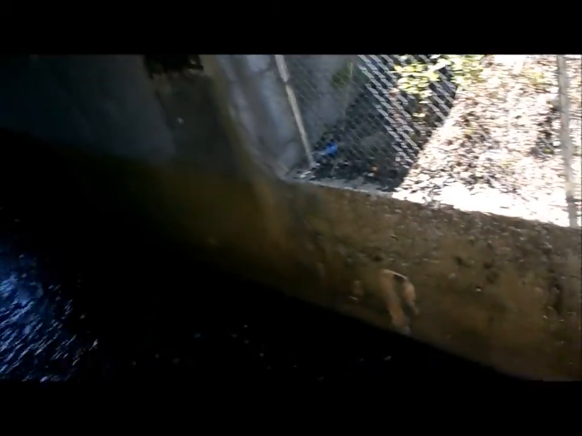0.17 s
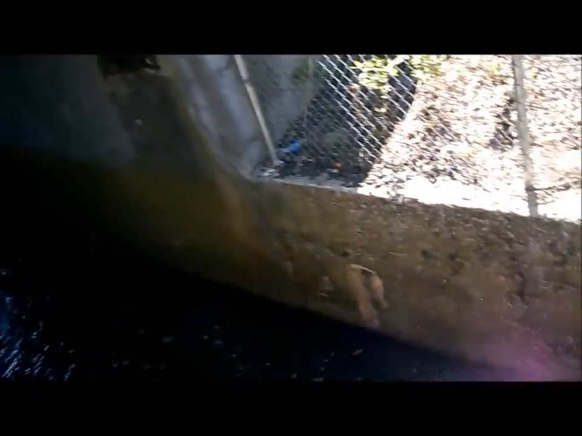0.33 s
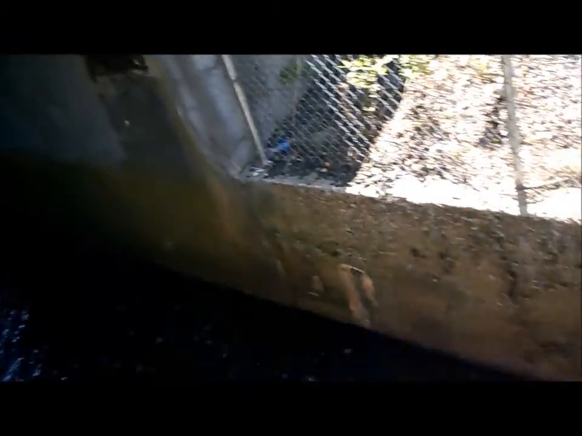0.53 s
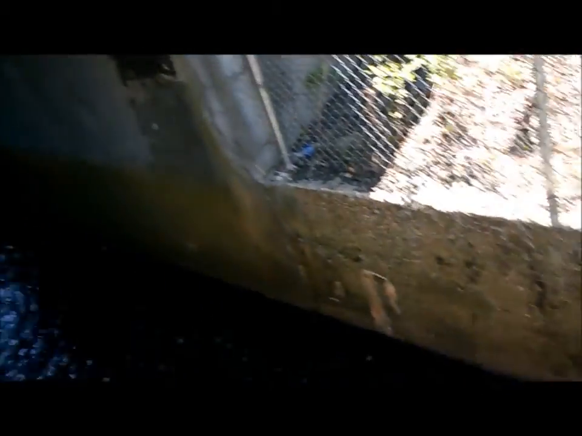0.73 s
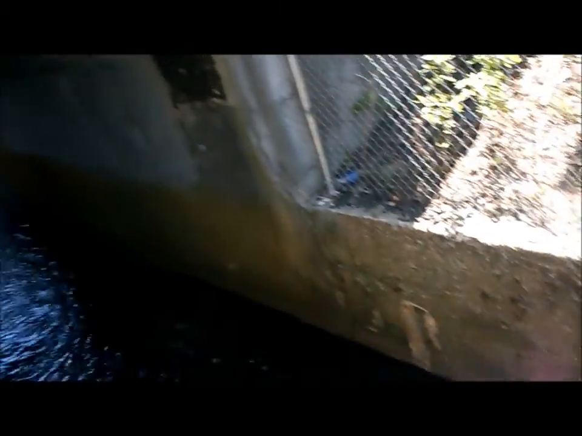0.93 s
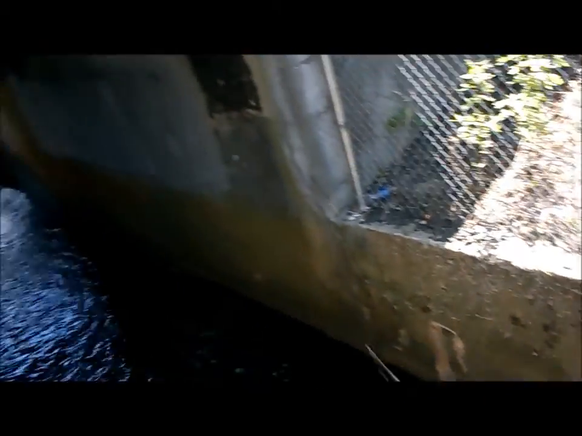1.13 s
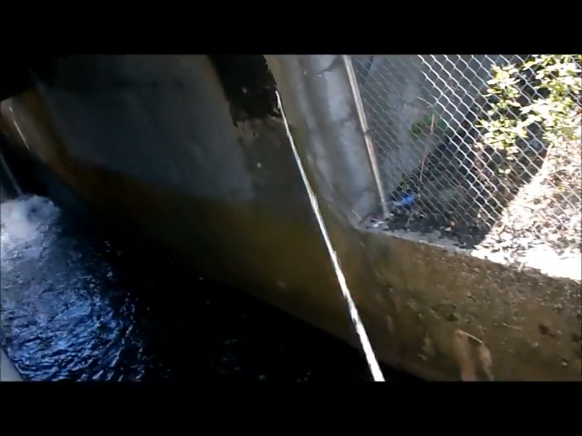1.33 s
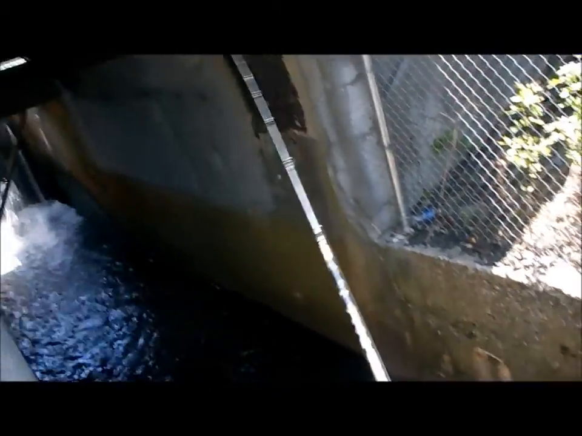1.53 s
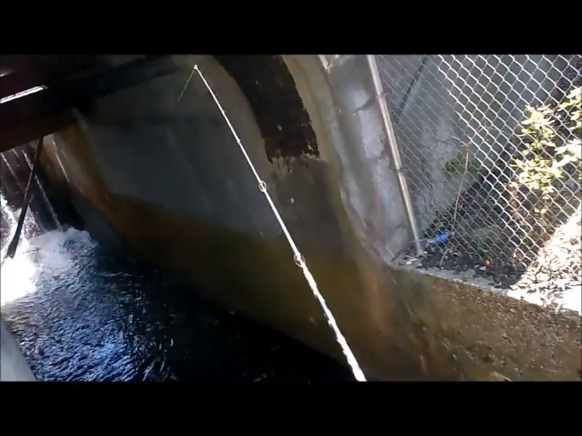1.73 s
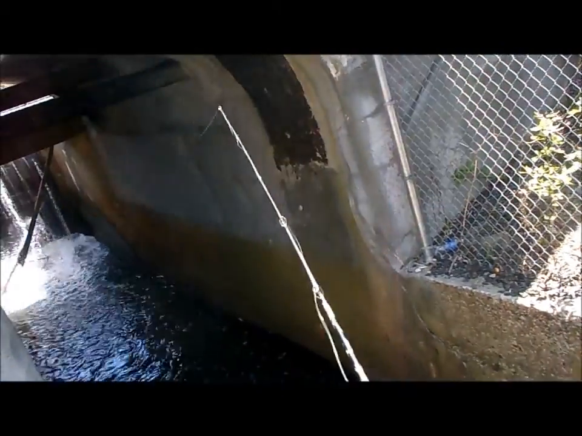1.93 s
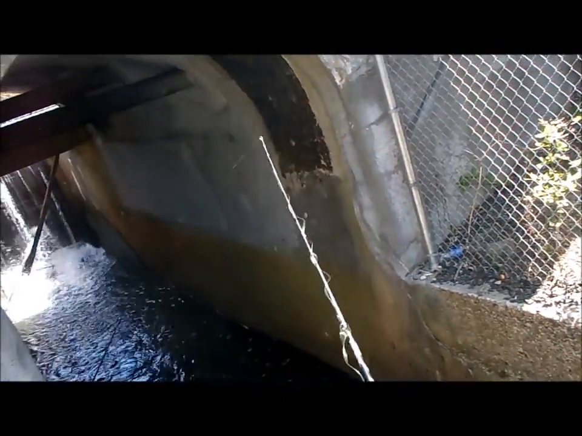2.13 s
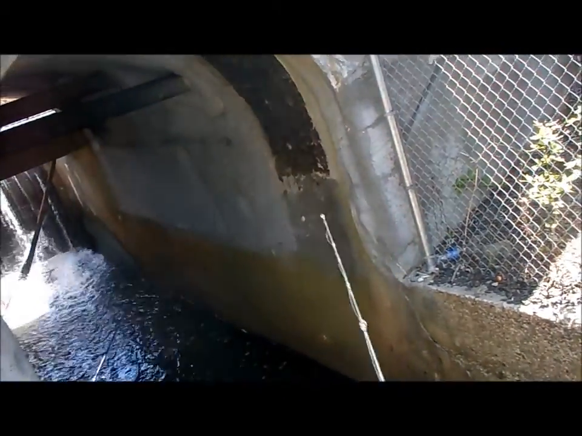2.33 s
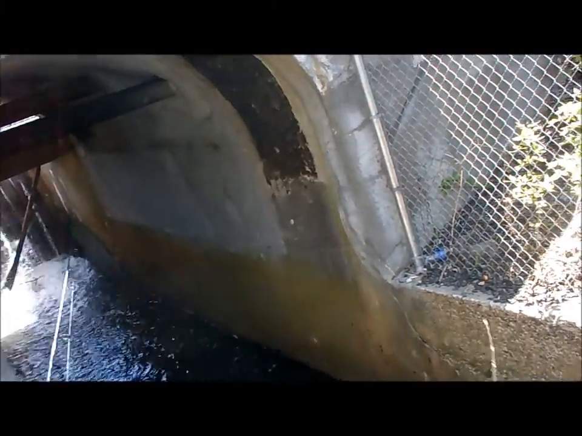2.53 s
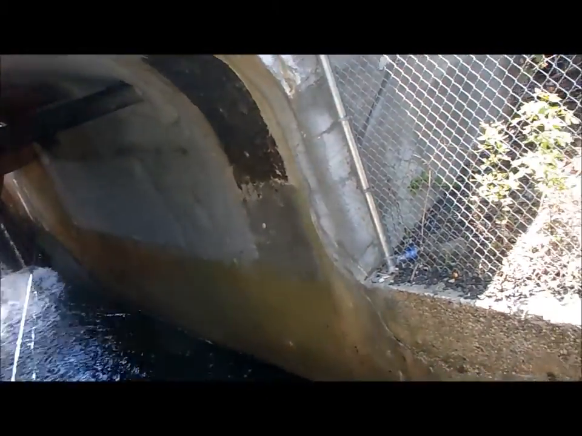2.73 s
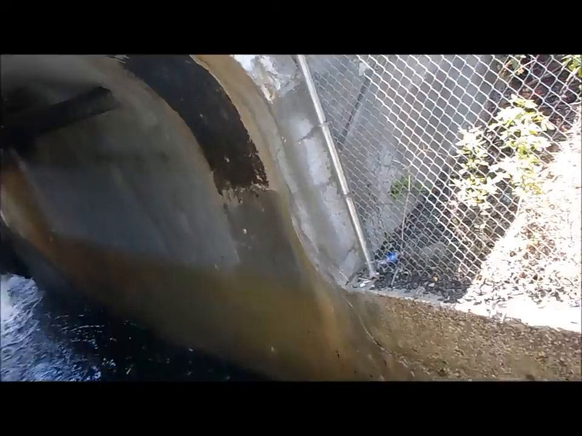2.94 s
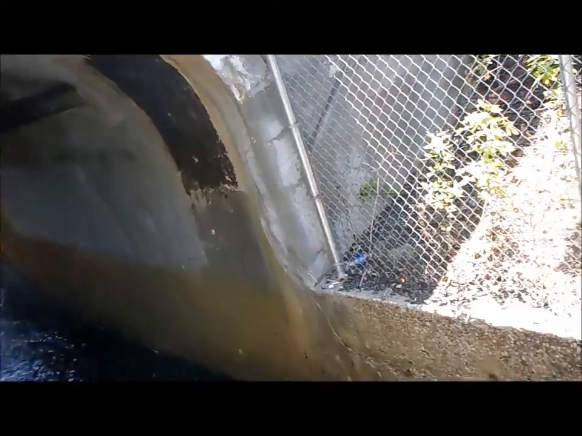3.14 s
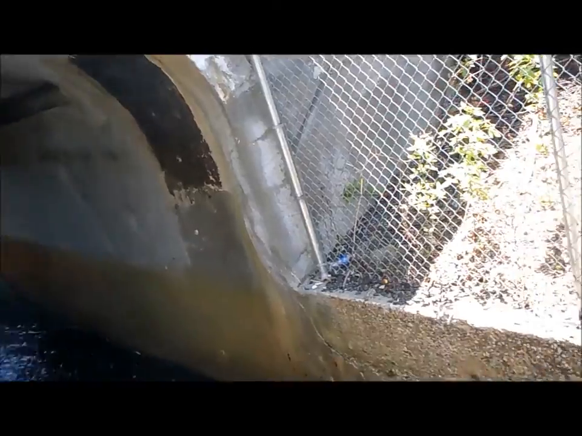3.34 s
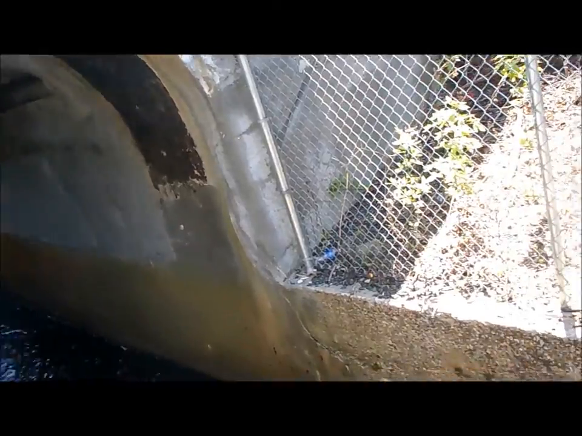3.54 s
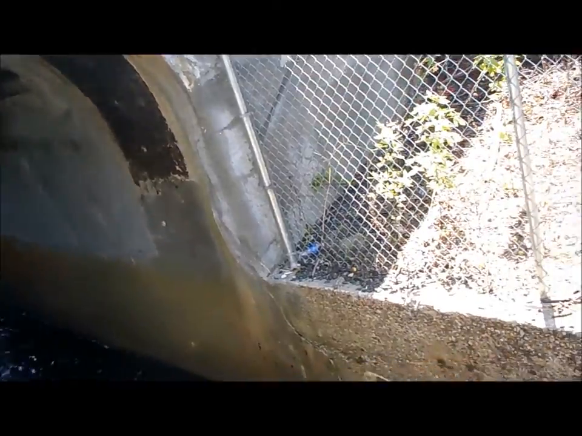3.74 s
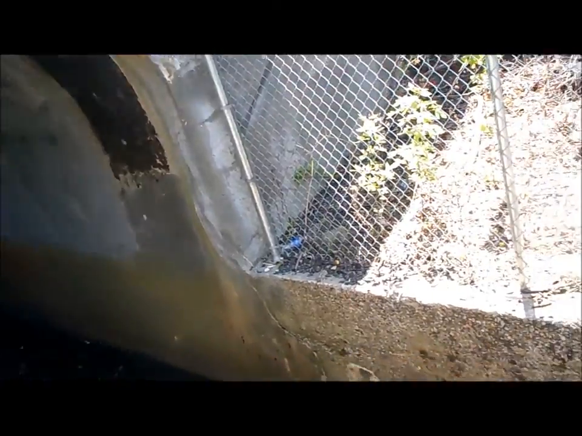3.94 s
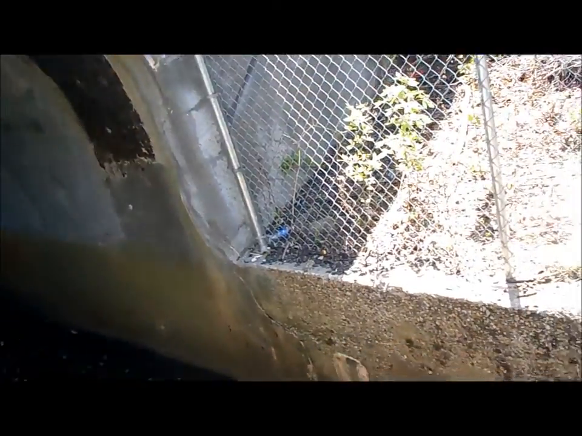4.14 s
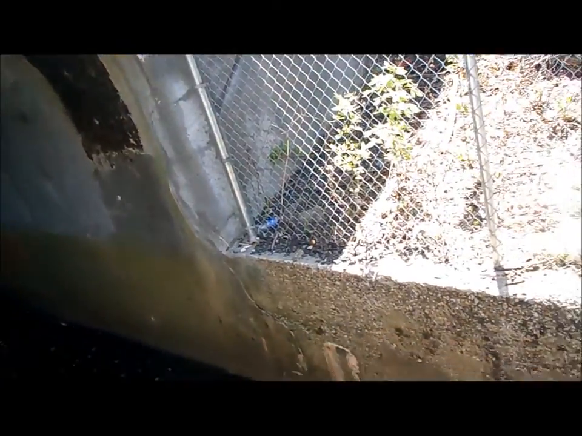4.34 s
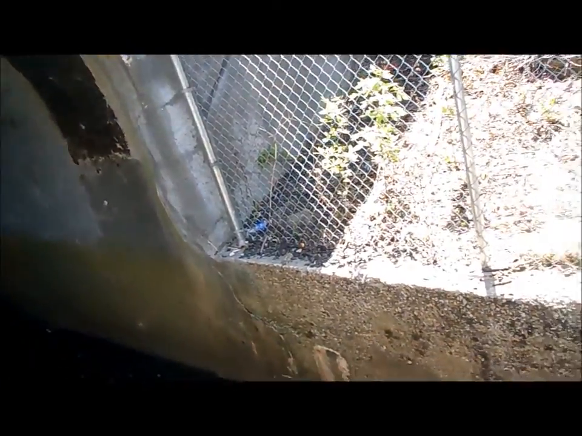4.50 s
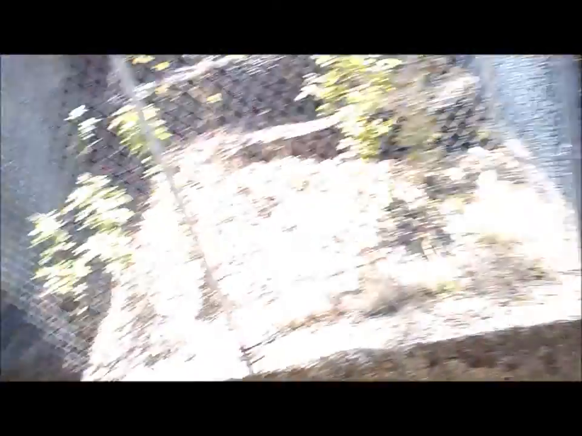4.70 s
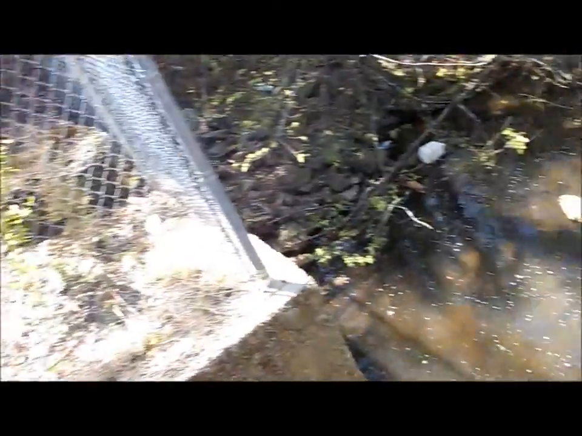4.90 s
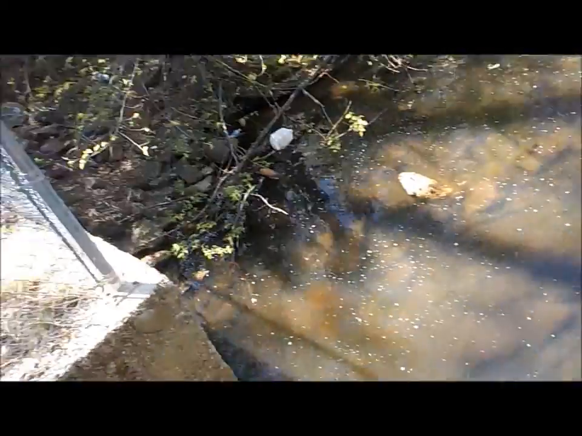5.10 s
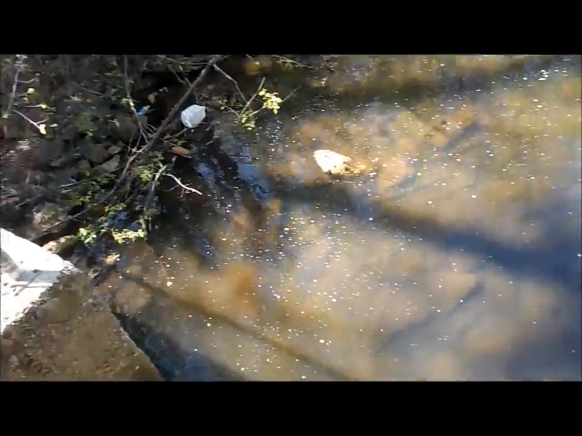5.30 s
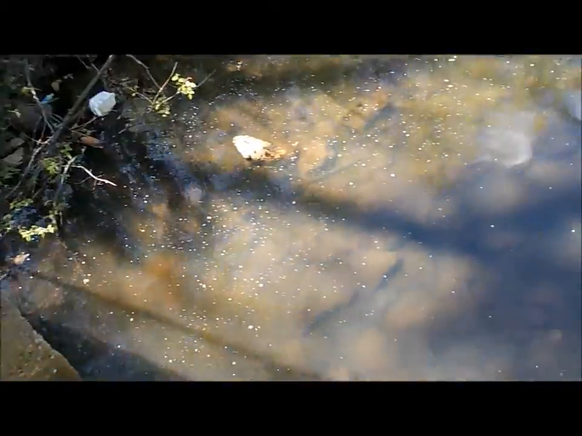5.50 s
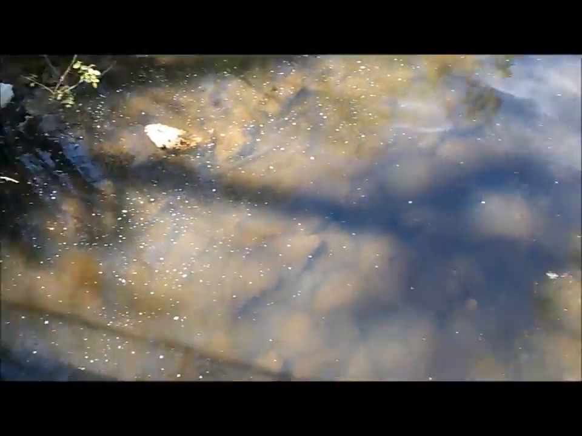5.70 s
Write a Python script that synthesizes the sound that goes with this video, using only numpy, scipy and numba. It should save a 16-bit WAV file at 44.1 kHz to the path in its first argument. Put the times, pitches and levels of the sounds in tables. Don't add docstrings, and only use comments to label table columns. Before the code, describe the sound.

A constant thin, boxy roar of falling water in a tunnel, two tiny scratchy ticks, and a softer, darker rush at the end.

```python
import sys
import numpy as np
from scipy import signal
from scipy.fft import rfft, irfft
from scipy.io import wavfile
from scipy.ndimage import uniform_filter1d
from numba import njit

SR = 44100
rng = np.random.default_rng(int(sys.argv[2]) if len(sys.argv) > 2 else 0)


def magnitude_from_level(level_db):
    exponent = np.asarray(level_db, float) / 20
    return 10 ** exponent


def store_wav(level_fs):
    pcm = np.round(np.clip(np.atleast_2d(level_fs), -1, 1) * 32767)
    wavfile.write(sys.argv[1], SR, pcm.T.astype(np.int16))


N = 254016


def unit(x):
    return x / np.sqrt(np.mean(x ** 2))


def colour(x, *spectra):
    log_hz = np.log(np.arange(N // 2 + 1) * SR / N + 1)
    gain_db = 0
    for spectrum in spectra:
        hz, db = np.transpose(spectrum)
        gain_db = gain_db + np.interp(log_hz, np.log(hz), db)
    return irfft(rfft(x) * magnitude_from_level(gain_db), N)


def walk(rate_hz):
    hold = int(SR / rate_hz)
    levels = np.repeat(rng.standard_normal(N // hold + 1), hold)
    smooth = uniform_filter1d(uniform_filter1d(levels, hold), hold)
    return unit(smooth[:N])


def band_noise(size, lo_hz, hi_hz):
    hz = np.arange(size // 2 + 1) * SR / size
    inside = (hz > lo_hz) & (hz < hi_hz)
    return unit(irfft(rfft(rng.standard_normal(size)) * inside, size))


def tackle():
    # start_s, level_db, length_s, centre_hz, width_hz
    swishes = [
        (2.033, -22, 0.0095, 7800, 5400),
        (2.038, -29, .026, 9600, 1800),
        (3.257, -24, .008, 8300, 3000),
    ]
    out = np.zeros(N)
    for start_s, level_db, length_s, centre_hz, width_hz in swishes:
        size = int(length_s * SR)
        burst = np.hanning(size) * band_noise(size, centre_hz - width_hz / 2, centre_hz + width_hz / 2)
        out[int(start_s * SR):][:size] += magnitude_from_level(level_db) * burst
    return out


def shading(x, surge_db, flicker_db):
    # time_s, turn (0-1)
    head_turn = [
        (0, 0),
        (1.5, 0),
        (3.5, 0.11),
        (4.3, 0.06),
        (4.7, 0.07),
        (4.95, 0.66),
        (5.3, 0.96),
        (5.76, 0.98),
    ]
    # frequency_hz, gain_db
    head_shadow = [(500, 0.5), (1300, 1.5), (1800, -5.5), (2400, -6.5), (3600, -5.5), (5000, -8),
                   (6500, -8.5), (10000, -4.5)]
    turn = np.interp(np.arange(N) / SR, *np.transpose(head_turn))
    shadow_hz, shadow_db = np.transpose(head_shadow)
    octave = np.log2(np.arange(N // 2 + 1) * SR / N + 1)
    centres = np.arange(8.4, 13.8, 0.25)
    spectrum, surge, out = rfft(x), walk(24.05), 0
    for centre in centres:
        share = np.interp(octave, centres, centres == centre)
        level_db = turn * np.interp(centre, np.log2(shadow_hz), shadow_db)
        level_db = level_db + surge_db * surge + flicker_db * walk(14)
        out = out + magnitude_from_level(level_db) * irfft(spectrum * share, N)
    return out


def tunnel(x, t60_s, wash_db):
    block = 1024
    moments = np.pad(x, (0, -N % block)).reshape(-1, block)
    t = np.arange(24 * block) / SR
    decay = np.exp(-np.log(1000) * t / t60_s)
    tails = rng.standard_normal((len(moments), len(t))) * decay
    wash = np.zeros(N)
    for k, echoes in enumerate(signal.fftconvolve(moments, tails, axes=1)):
        wash[(k * block + np.arange(len(echoes))) % N] += echoes
    return unit(x) + magnitude_from_level(wash_db) * unit(wash)


def spray():
    return rng.standard_normal(N)


@njit
def ring(length, start, turn, size, cycles, glide):
    out = np.zeros(length)
    for k in range(len(start)):
        span = int(cycles * 2 * np.pi / turn[k])
        step = np.exp(1j * turn[k] - 5 / span)
        bend = np.exp(1j * turn[k] * glide / span)
        z = size[k] + 0j
        for i in range(start[k], min(start[k] + span, length)):
            z *= step
            step *= bend
            out[i] += z.imag
    return out


def weir(cycles, glide, scatter_db):
    when, pitch, chance = rng.random((200000, 3)).T
    turn = 2 * np.pi * (40 + 12500 * pitch) / SR
    size = np.sqrt(turn) * magnitude_from_level(scatter_db * chance)
    return ring(N, (when * N).astype(np.int64), turn, size, cycles, glide)


def scene():
    bubbles = weir(cycles=7.0, glide=0.2, scatter_db=6.0)
    rush = unit(tunnel(bubbles, t60_s=0.54, wash_db=2.5)) + magnitude_from_level(2.5) * spray()
    water = shading(rush, surge_db=0.33, flicker_db=0.24)
    mono = unit(water) + magnitude_from_level(23.5) * tackle()
    return np.array([mono, mono])


def low_pass(x):
    return signal.sosfilt(signal.butter(12, 11200, fs=SR, output="sos"), x)


def record(dry):
    # frequency_hz, gain_db
    bass_cut = [(25, -73), (50, -66), (80, -44), (130, -32.5), (200, -23), (300, -17.5), (410, -7.5),
                (700, -3), (1400, -0.5)]
    # frequency_hz, gain_db
    port = [(1400, -13), (1620, -8), (2000, -5), (2250, -1.5), (2450, 0.5), (2780, -5.5), (3030, -3.5),
            (3400, -10), (3700, -12.5), (4050, -19), (4550, -14.5), (5000, -16), (6000, -21.5),
            (7600, -28.5), (9900, -29.5)]
    # frequency_hz, gain_db
    skirt = [(9900, 0), (10400, -4.5), (10800, -14), (11050, -24), (11250, -36), (11600, -80)]
    mid = colour(dry[0], bass_cut, port, skirt)
    mid = mid * magnitude_from_level(-15.5) / np.std(mid[:4 * SR])
    return low_pass(np.array([mid, mid]))


dry = scene()
out = record(dry)
store_wav(out)
```